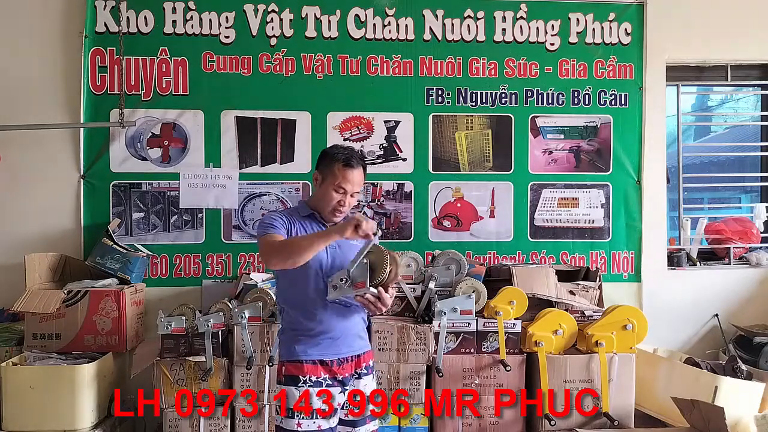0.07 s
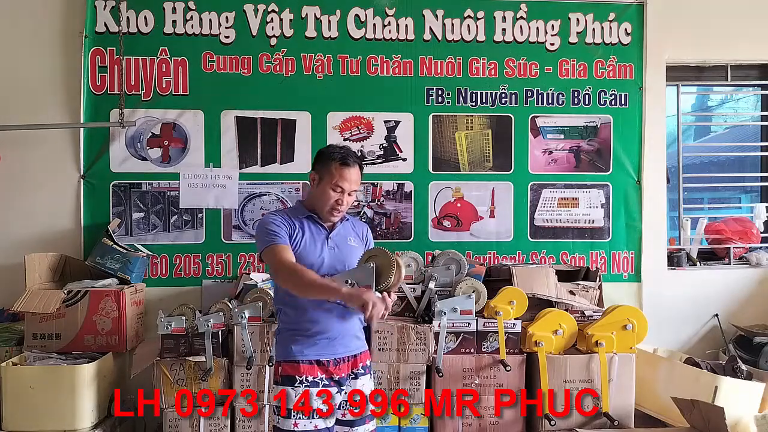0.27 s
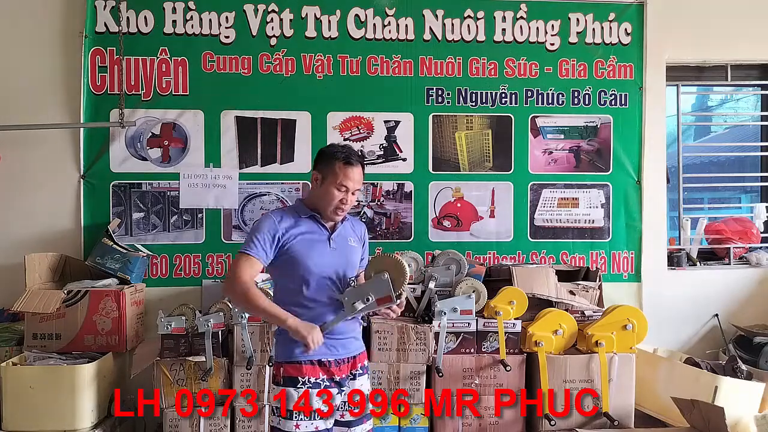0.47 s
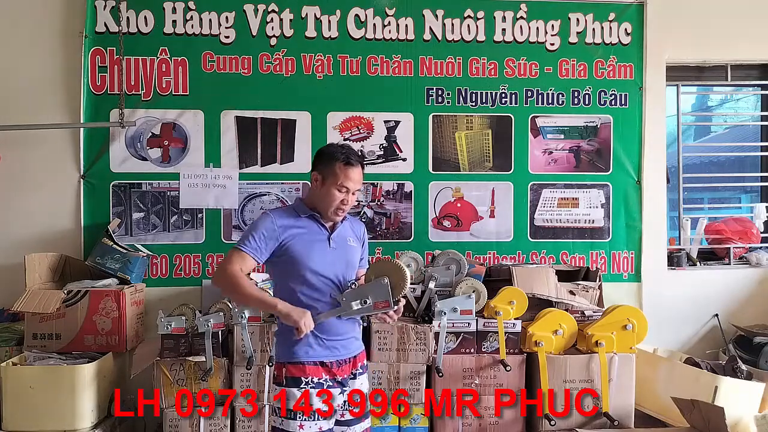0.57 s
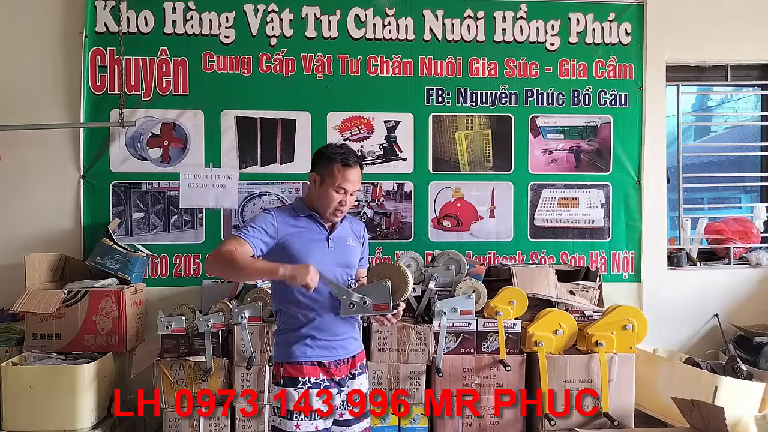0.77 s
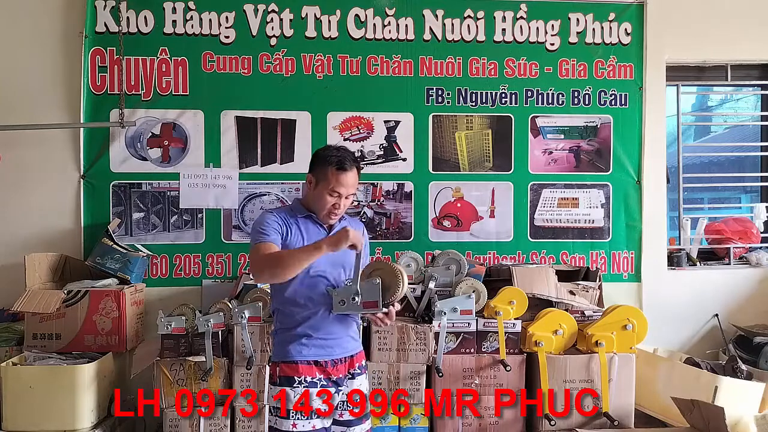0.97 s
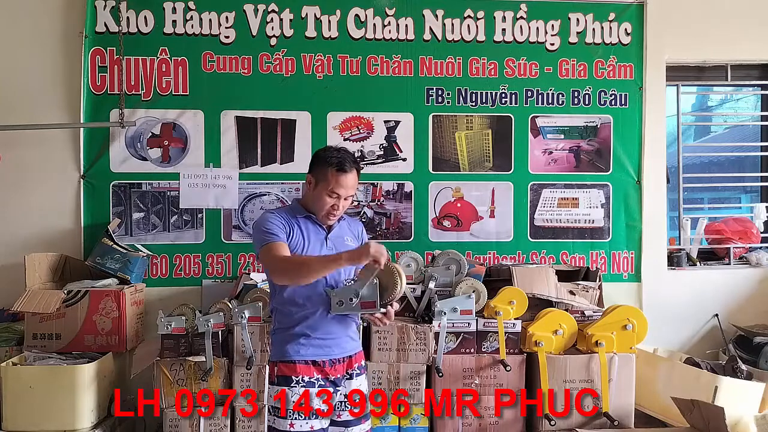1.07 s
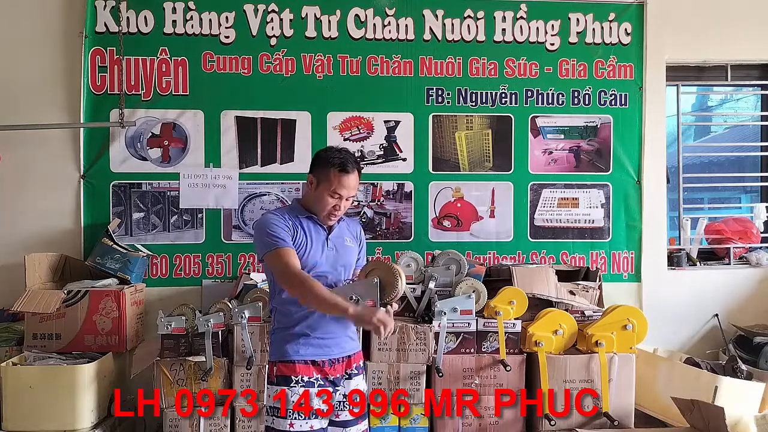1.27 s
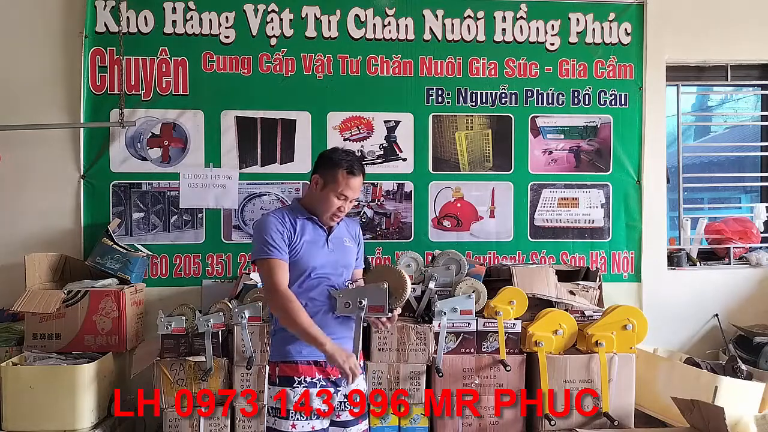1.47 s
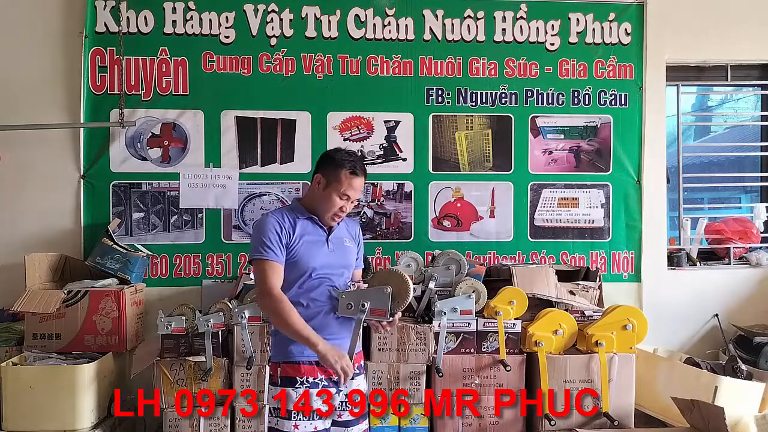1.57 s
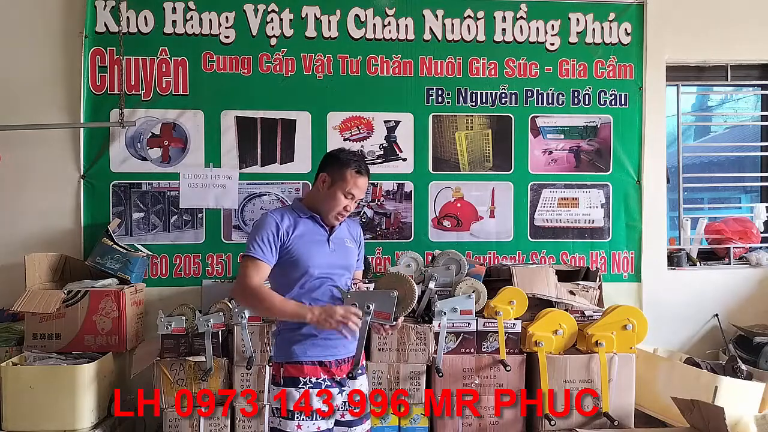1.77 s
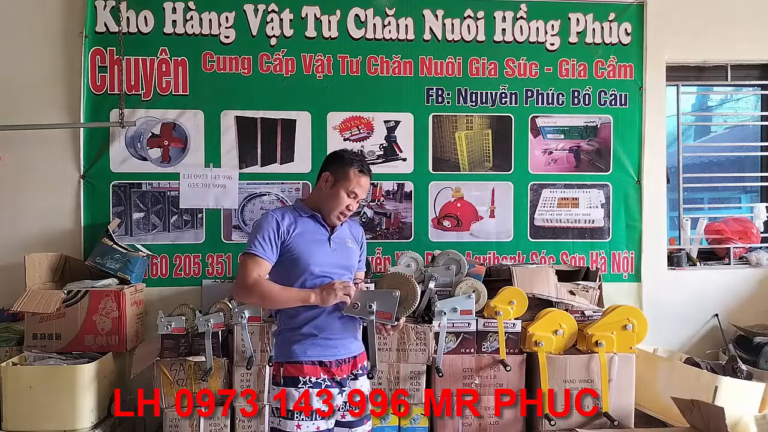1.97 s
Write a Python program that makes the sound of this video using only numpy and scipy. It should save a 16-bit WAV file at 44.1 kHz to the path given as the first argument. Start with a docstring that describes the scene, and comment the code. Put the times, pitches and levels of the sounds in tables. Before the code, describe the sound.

A hand-crank winch spins fast, its ratchet clicking brightly about twenty-five times a second with gear rattle, then ends in a few clacks; faint steel ticks follow in a bare storeroom, heard from a few metres.

```python
"""A hand-crank winch is turned fast a few metres from the microphone in a bare storeroom: pawl drops ring the steel,
gears rattle between the clicks, and the crank ends with its last clacks. Then the steel rubs and ticks faintly in
the hands. Blows and random contacts drive decaying sine modes, with noise for the crack; a dull knock comes late.
The room adds noise tails of about half a second over its steady hum, and a faint bass hiss follows the clatter."""
import sys
import numpy as np
from scipy import signal
from scipy.fft import rfft, irfft
from scipy.io import wavfile
from scipy.ndimage import uniform_filter1d

SR = 44100
rng = np.random.default_rng(int(sys.argv[2]) if len(sys.argv) > 2 else 0)


def makeup_ratio(level_db):
    """Linear amplitude ratio for a level in decibels (20 dB per factor of ten)."""
    decades = np.asarray(level_db, float) / 20
    return 10 ** decades


def master(y):
    """Save y as 16-bit WAV."""
    cut = np.clip(np.atleast_2d(y).T, -1, 1)
    pcm = np.round(cut * 32767)  # scale
    wavfile.write(sys.argv[1], SR, pcm.astype(np.int16))


N = 88464   # samples heard
LEAD = SR // 2   # samples played before the start, so that the room is already sounding
LEN = N + LEAD

# Hum of room and street. Each row: frequency in Hz, relative density in dB per Hz.
HUM_SPECTRUM = [(15, -76), (25, -32), (64, -15), (114, -2.5), (438, -4), (488, -8), (773, 0.5), (1690, -8),
                (6030, -18.5), (6900, -31), (7480, -33), (8120, -34.5), (16000, -43)]
HUM_DB, HUM_WAVER_DB = -52.5, 1.5   # rms level; spread of each band's wavering

# Low noise that rises and falls with the clatter. Each row: frequency in Hz, relative density in dB per Hz.
UNDERTONE_SPECTRUM = [(12, -31), (20, 0), (49, -1), (165, -4), (370, -3), (620, -6), (810, -37),
                      (1360, -120)]
UNDERTONE_DB, UNDERTONE_SMOOTH_S = -25.5, 0.035   # level against the clatter; smoothing window

# Decay of the storeroom. Each row: frequency in Hz, time to fall 60 dB in s.
ROOM_DECAY = [(300, 0.29), (1000, 0.42), (3000, .48), (7000, 0.51), (14000, 0.52)]
ROOM_DB, ROOM_BUILD_S = -1.5, 0.0036
TAIL_TURN_S = 0.3004   # time from one random set of reflections to the next, so that the ringing varies

# Dull knock somewhere in the room. Each row: start in seconds, level in dB.
DULL_KNOCKS = [(1.771, -37)]
# What the knock rings with. Each row: frequency in Hz, level in dB, time to fall 60 dB in s.
KNOCKED_BODY = [(1060, -8, 0.051), (1400, -8, .03), (1610, -7, .05), (1746, -6.5, 0.045), (1940, -9, 0.036),
                (2650, -14, 0.13), (3710, -13, 0.089), (3950, -14, 0.07)]

# Pawl drops. Each row: start in seconds, level in dB, extra weight of the drum's low modes in dB,
# extra weight of the frame's middle modes in dB, decay constant of the rattle in s (1 ms at least).
PAWL_DROPS = [(0.0287, -10, -11, 6.5, 0.0021), (0.0675, -9, 2, 6, 0.009), (0.1092, -8, 2.5, 8, 0.0055),
              (0.1458, -10, 0, 6.5, 0.0098), (0.183, -15.5, -11, 6, 0.0045), (0.2237, -17, -3, 6, 0.011),
              (0.2664, -14, -2, 3, 0.0031), (0.3112, -12.5, 1.5, -13, .01), (0.3522, -9, -10, 5, 0.0086),
              (0.3926, -11, -13, 5.5, 0.014), (0.437, -19.5, -0.5, 3, 0.024), (0.476, -18, 6, 9.5, 0.013),
              (0.5166, -19, 3, -10, 0.0098)]
# The drop just before the start. One row: the columns of the pawl drops after the time.
EARLIER_DROP = (-10.5, -9, 12, -0.01)
EARLIER_DROP_S = -0.014
# The crank's last clacks, then faint ticks of the steel in the hands. Each row: the columns of the pawl drops.
CLACKS_AND_TICKS = [(0.6018, -9.5, 2, 5, 0.0082), (0.636, -21.5, 0, 4, 0.0079),
                    (0.675, -24, 13.5, 3, 0.011), (0.9, -46, 7, 10, 0.016), (0.961, -36.5, 9, 7, 0.0059),
                    (0.985, -44, -4, -6, 0.0093), (1.081, -34.5, -5, 0, .016),
                    (1.103, -46, -3, -10, 0.0081), (1.126, -38, -8, -3, 0.011),
                    (1.385, -49, -8, -7, 0.0079), (1.506, -48.5, 9, 10, 0.0064), (1.617, -27, -4, 2, 0.013),
                    (1.6691, -36.5, -9, -1, 0.0098)]
# Gears rubbing while the crank turns. Each row: time in seconds, level in dB.
GEAR_RUB = [(0, -31.5), (.2, -39), (.3, -38), (.45, -38), (.56, -40.5), (.62, -34), (.72, -53.5), (.8, -79)]
# Steel sliding in the hands. Each row: time in seconds, level in dB, extra weight of the low modes in dB.
HAND_RUB = [(.84, -77, -1), (.9, -56.5, 13), (.97, -51.5, 9), (1.04, -59, 6), (1.1, -62, -21),
            (1.17, -60, 9), (1.22, -73, 8), (1.33, -67, 13), (1.37, -64, -5), (1.4, -62.5, -3),
            (1.5, -66, 14), (1.56, -82, 8), (1.6, -66, -2)]
# Modes of frame, drum and gears. Each row: frequency in Hz, time to fall 60 dB in s, relative level in dB
# under the pawl, under the clacks and ticks, and when rubbed by hand.
STEEL_MODES = [(705, .08, -16.5, -15, -25), (804, 0.094, -3, -8, -5.5), (853, .12, -37, -5.5, -15),
               (906.2, 0.13, -3.5, -2, -4.5), (992, 0.054, -8, -3.5, -4), (1294, 0.066, -11, -13, -6),
               (1503, 0.01, 1, -20, -30), (2900, 0.007, 1.5, -10, -32), (1350, .1, -19, -7, -6),
               (1582, 0.058, -2, -33, -24), (1641, 0.054, -5, -14, -11), (1856, 0.06, -7.5, -24, -23),
               (1985, 0.034, -20, -8, -20), (2126, 0.024, -4, 4, -9), (2216, 0.071, -13.5, 1.5, -14),
               (2442, .06, -9, -6, -9), (2657, 0.068, -10.5, -3.5, -17.5), (2813, 0.054, -5.5, -7, -12),
               (3547, 0.094, -2.5, -4, -7), (3650, 0.05, -2, -23, -4), (3791, 0.078, -4.5, 0, -1.5),
               (3920, .06, 6, -5, -8.5), (3963, 0.04, -8, -14, -8), (4330, .06, -34, -3, -21),
               (4504, .06, -6.5, -2, -19), (4720, 0.053, 0.5, -3.5, -9), (4812, 0.054, 2.5, 0.5, -14),
               (4960, 0.045, -7, -0.5, -21), (4950, 0.051, -6, -4, -15), (5543, 0.083, -1, -5, -14),
               (5940, 0.027, 0, -9, -2), (6500, 0.043, -3, -7, -22), (7160, 0.045, 2, 5, -18),
               (7285, .11, -7, -11, 3), (7450, .06, -6, -8.5, -22), (11120, .07, -33, -28, -16),
               (15100, .07, -34, -30, -21)]
# Broad colour of steel on steel. Each row: frequency in Hz, relative density in dB per Hz.
CONTACT_SPECTRUM = [(380, -47), (650, -15), (805, 2), (1110, -4), (1590, -5.5), (3240, -2.5), (3560, 1.5),
                    (4650, 1), (5180, -3), (7240, -4), (9090, -18.5), (14900, -17.5), (16000, -22)]

MODES_DB, STRENGTH_SPREAD_DB = -18, 1.5   # level of all modes; scatter from strike to strike
LOW_MODES_UNDER_HZ, MID_MODES_UNDER_HZ = 1150, 3200
PAWL_FIRST_BLOW, LATE_FIRST_BLOW = 0.8, 0.25   # height of the first blow against the strike's level
PAWL_RISE_S, LATE_RISE_S = 0.0002, 0.002   # rise constant of the chatter
CHATTER_PER_S, TEETH_PER_S = 5000, 1500   # mean rate of contacts while settling and while rubbing
RUB_FLICKER_DB = 2.5   # spread of each mode's wavering in the hands
CRACK_DB, CRACK_T60_S = -20, 0.012
LATE_CRACK_DB = -1   # the clacks and ticks hiss less
RUB_WASH_DB = -5   # noise of rubbing
THIN_UNDER_HZ = 660   # the small frame radiates no bass


def rms_one(x):
    """Scale to rms 1."""
    return x / np.sqrt(np.mean(x ** 2) + 1e-20)


def at_hz(points, hz):
    """Read a table on a log-frequency axis."""
    table = np.array(points)
    return np.interp(np.log(hz), np.log(table[:, 0]), table[:, 1])


def curve(rows):
    """Columns of a table over time; the end values hold outside it."""
    s, *columns = np.transpose(rows)
    time = (np.arange(LEN) - LEAD) / SR
    return [np.interp(time, s, c) for c in columns]


def wander(points):
    """Straight lines between normal random values spread evenly over time."""
    return np.interp(np.arange(LEN), np.linspace(0, LEN, points), rng.standard_normal(points))


def colour(x, spectrum):
    """Give noise the spectrum of a table."""
    hz = np.maximum(np.arange(len(x) // 2 + 1) * SR / len(x), 1)
    return irfft(rfft(x) * makeup_ratio(at_hz(spectrum, hz)), len(x))


def bands(count):
    """Log-spaced band filters, each with its centre in Hz."""
    edges = np.geomspace(20, 17000, count + 1)
    return [(signal.butter(2, [low, high], "band", fs=SR, output="sos"), np.sqrt(low * high))
            for low, high in zip(edges, edges[1:])]


def ring(drive, hz, t60):
    """A two-pole resonator: a unit click sets a decaying sine of height about 1 ringing."""
    radius = makeup_ratio(-60 / (max(t60, 0.005) * SR))
    turn = 2 * np.pi * hz / SR
    return signal.lfilter([0, np.sin(turn)], [1, -2 * radius * np.cos(turn), radius ** 2], drive + 1e-18)


def touches(rate):
    """Random contacts of uneven size and either sign; rms 1."""
    happens = rng.random(LEN) < rate / SR
    size = makeup_ratio(2.06 * np.minimum(rng.exponential(1, LEN), 4))
    return rms_one(happens * size * rng.choice([-1, 1], LEN))


def ambience():
    """Steady hum of room and street: coloured noise in which each band wavers a little."""
    noise = colour(rng.standard_normal(LEN), HUM_SPECTRUM)
    hum = 0
    for sos, _ in bands(count=10):
        hum = hum + signal.sosfiltfilt(sos, noise) * makeup_ratio(HUM_WAVER_DB * wander(20))
    return makeup_ratio(HUM_DB) * rms_one(hum)


def undertone(x):
    """Low noise that follows the smoothed level of the clatter."""
    power = uniform_filter1d(x ** 2, int(UNDERTONE_SMOOTH_S * SR) + 1)
    level = np.sqrt(np.maximum(power, 0))
    return makeup_ratio(UNDERTONE_DB) * level * rms_one(colour(rng.standard_normal(LEN), UNDERTONE_SPECTRUM))


def room(x):
    """Dense tails build in a few ms and die band by band; four random tails take turns to vary the ringing."""
    t = np.arange(SR) / SR
    turn = np.arange(LEN) / SR / TAIL_TURN_S
    out = 0
    for which in range(4):
        white = rng.standard_normal((2, SR))
        tail = 0
        for k, (sos, hz) in enumerate(bands(count=12)):
            # neighbouring bands take separate noises
            tail = tail + signal.sosfilt(sos, white[k % 2]) * makeup_ratio(-60 * t / at_hz(ROOM_DECAY, hz))
        tail = tail * (1 - np.exp(-t / ROOM_BUILD_S))
        tail = tail / np.sqrt(np.sum(tail ** 2))
        share = np.maximum(np.cos(np.pi / 2 * (turn - which)), 0)   # equal-power crossfade
        out = out + signal.fftconvolve(x * share, tail)[:LEN]
    return makeup_ratio(ROOM_DB) * out


def knocks():
    """A dull blow sets the modes of one small body ringing."""
    clicks = np.zeros(LEN)
    for s, db in DULL_KNOCKS:
        clicks[LEAD + int(s * SR)] = makeup_ratio(db)
    return sum(makeup_ratio(db) * ring(clicks, hz, t60) for hz, db, t60 in KNOCKED_BODY)


def strikes():
    """Each pawl drop, clack or tick is a first blow and the envelope of a quickly rising, dying chatter."""
    rows = np.array([(EARLIER_DROP_S, *EARLIER_DROP)] + PAWL_DROPS + CLACKS_AND_TICKS)
    is_late = np.arange(len(rows)) > len(PAWL_DROPS)   # the clacks and ticks
    starts = LEAD + (rows[:, 0] * SR).astype(int)
    t = np.arange(SR // 6) / SR
    rise = np.where(is_late, LATE_RISE_S, PAWL_RISE_S)[:, None]
    settle = (1 - np.exp(-t / rise)) * np.exp(-t / np.maximum(rows[:, 4:], 1e-3))
    # equal energy before the level is set
    settle = settle / np.sqrt(np.sum(settle ** 2, axis=1, keepdims=True)) * makeup_ratio(rows[:, 1:2])
    first = np.where(is_late, LATE_FIRST_BLOW, PAWL_FIRST_BLOW) * makeup_ratio(rows[:, 1])
    return rows, is_late, starts, settle, first


def rubbing():
    """Levels over time of the gears and of the hands, with the low-mode weight of the hands in dB."""
    before = (HAND_RUB[0][0] - 0.1, -90, 0)
    after = (HAND_RUB[-1][0] + 0.2, -90, 0)
    hand_db, hand_low_db = curve([before] + list(HAND_RUB) + [after])
    return makeup_ratio(curve(GEAR_RUB)[0]), makeup_ratio(hand_db), hand_low_db


def steel_ringing(hits, rubs):
    """Blows, chatter and rubbing contacts drive every mode of the steel."""
    rows, is_late, starts, settle, first = hits
    gears, hands, hand_low_db = rubs
    span = settle.shape[1]
    strengths = rng.normal(0, STRENGTH_SPREAD_DB, (len(rows), len(STEEL_MODES)))
    chatter, teeth = touches(CHATTER_PER_S), touches(TEETH_PER_S)
    out = np.zeros(LEN)
    for k, (hz, t60, pawl_db, late_db, hand_db) in enumerate(STEEL_MODES):
        low = hz < LOW_MODES_UNDER_HZ
        mid = LOW_MODES_UNDER_HZ < hz < MID_MODES_UNDER_HZ
        mode_db = np.where(is_late, late_db, pawl_db) + strengths[:, k]
        gains = makeup_ratio(mode_db + low * rows[:, 2] + mid * rows[:, 3])
        blows, force = np.zeros(LEN), np.zeros(LEN)
        blows[starts] = first * gains * (-1) ** k
        for at, shape, gain in zip(starts, settle, gains):
            force[at:at + span] += shape * gain
        flicker_db = RUB_FLICKER_DB * wander(40)
        rub = gears * makeup_ratio(pawl_db) + hands * makeup_ratio(hand_db + low * hand_low_db + flicker_db)
        rub = rub / np.sqrt(t60 * SR / 500)   # long modes gather more contacts
        # each mode meets the contacts at another offset
        drive = blows + force * np.roll(chatter, 131 * k) + rub * np.roll(teeth, 997 * k)
        out += makeup_ratio(MODES_DB) * ring(drive, hz, t60)
    return out


def contact_noise(hits, rubs):
    """Steel on steel: broad noise that cracks at each strike and washes under the rubbing."""
    _, is_late, starts, settle, first = hits
    gears, hands, _ = rubs
    span = settle.shape[1]
    force = np.zeros(LEN)
    for at, shape, blow, late in zip(starts, settle, first, is_late):
        force[at:at + span] += shape * makeup_ratio(LATE_CRACK_DB * late)
        force[at] += blow * makeup_ratio(LATE_CRACK_DB * late)
    crack = signal.lfilter([1], [1, -makeup_ratio(-60 / (CRACK_T60_S * SR))], force + 1e-18)
    level = makeup_ratio(CRACK_DB) * crack + makeup_ratio(RUB_WASH_DB) * (gears + hands)
    # bring the mean power of the colour to 1
    gain = 1 / np.sqrt(np.mean(makeup_ratio(2 * at_hz(CONTACT_SPECTRUM, np.linspace(1, SR / 2, 999)))))
    return gain * colour(rng.standard_normal(LEN) * level, CONTACT_SPECTRUM)


def winch():
    """Strikes and rubbing feed the same steel and its contact noise; the small frame thins the bass."""
    hits, rubs = strikes(), rubbing()
    steel = steel_ringing(hits, rubs) + contact_noise(hits, rubs)
    return signal.sosfilt(signal.butter(4, THIN_UNDER_HZ, "high", fs=SR, output="sos"), steel)


def scene():
    """Winch and knock in the room, over the hum."""
    near = winch() + knocks()
    heard = near + room(near)
    return (heard + undertone(heard) + ambience())[None, LEAD:]


def roll_off(x):
    """The treble ends steeply here."""
    return signal.sosfilt(signal.butter(12, 16100, fs=SR, output="sos"), x)


def record(dry):
    """One microphone channel whose top is cut steeply, 60 dB down from 16.3 kHz."""
    top_cut = signal.cheby2(12, 60, 16300, fs=SR, output="sos")
    return roll_off(signal.sosfilt(top_cut, dry))


dry = scene()
out = record(dry)
master(out)
```